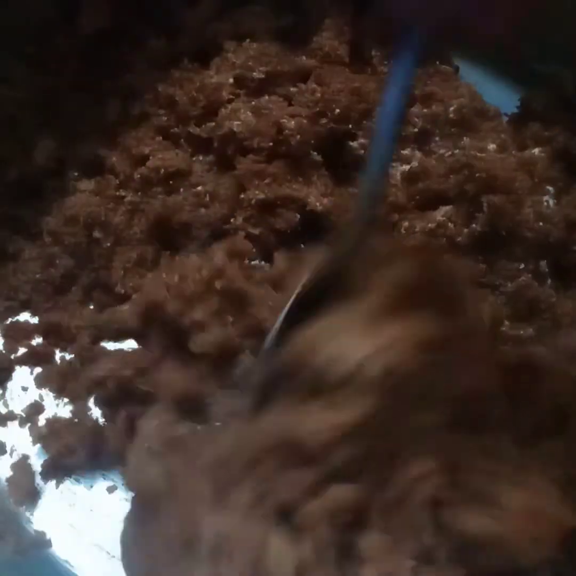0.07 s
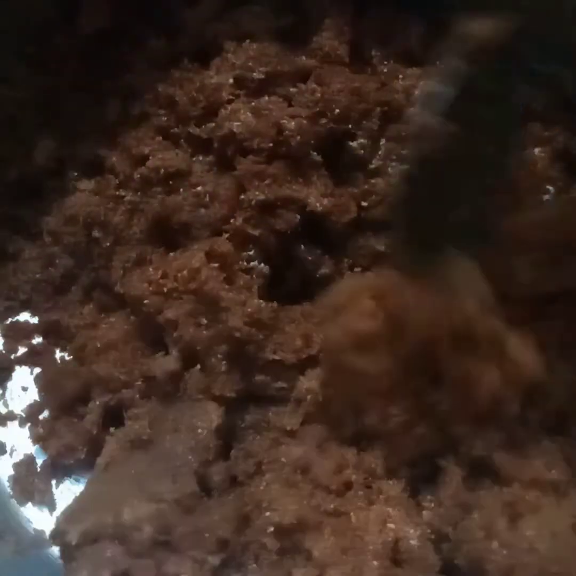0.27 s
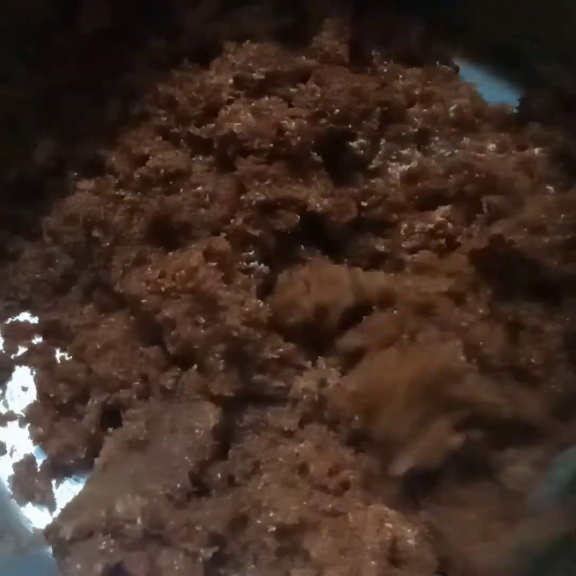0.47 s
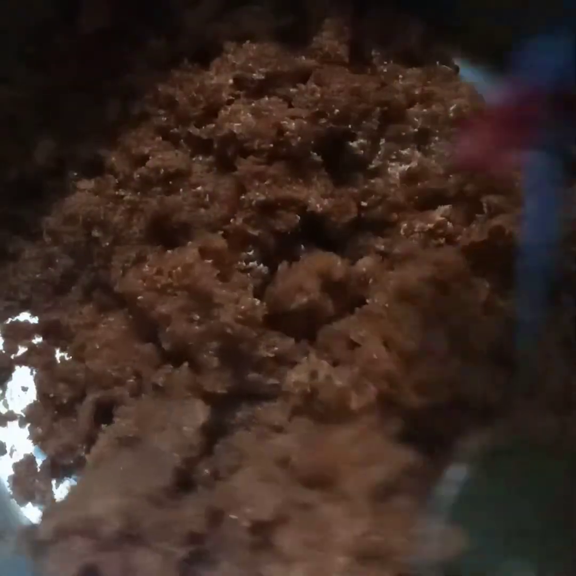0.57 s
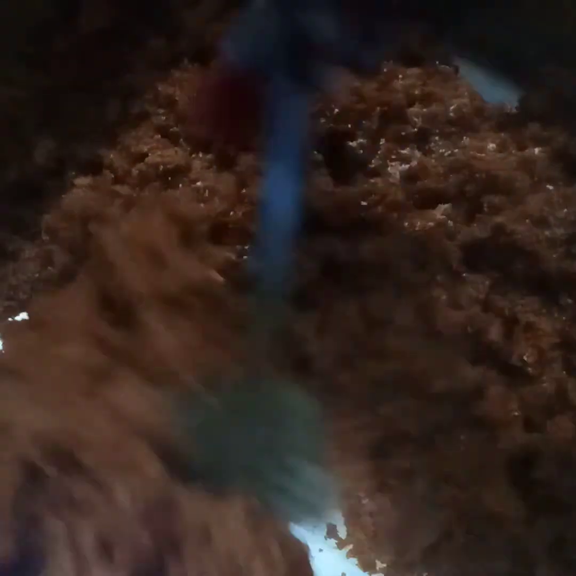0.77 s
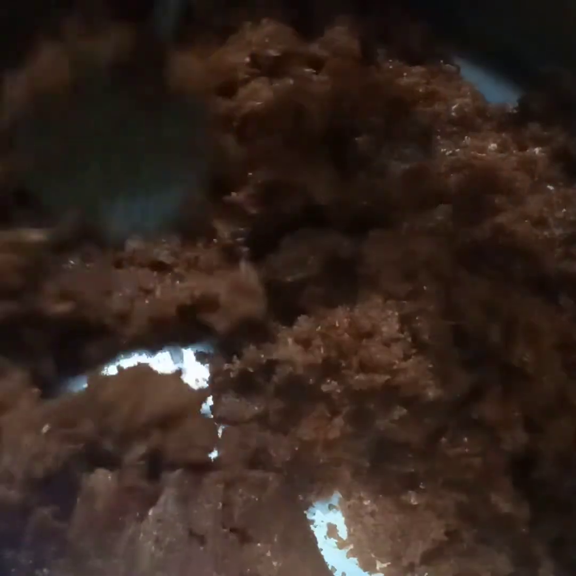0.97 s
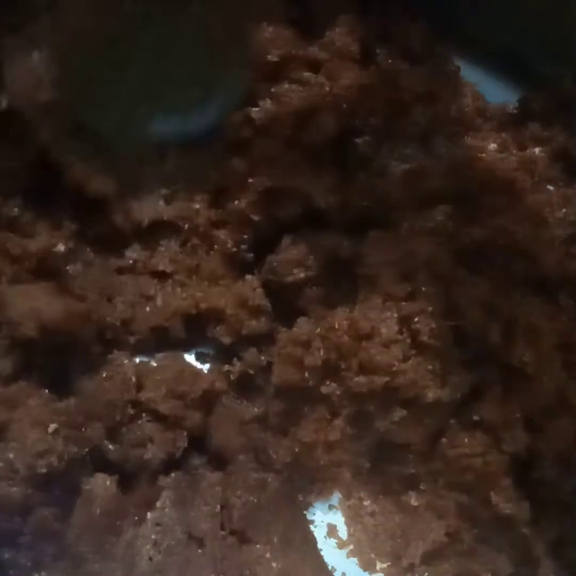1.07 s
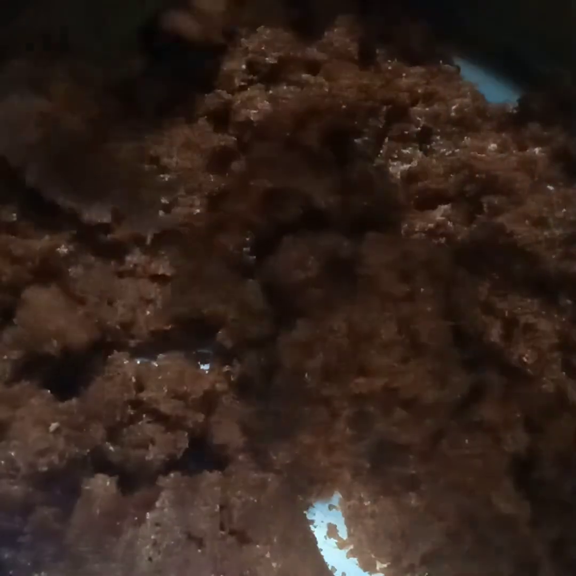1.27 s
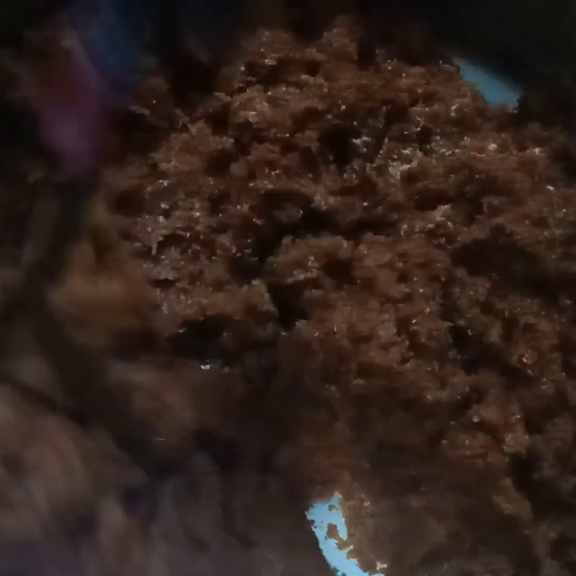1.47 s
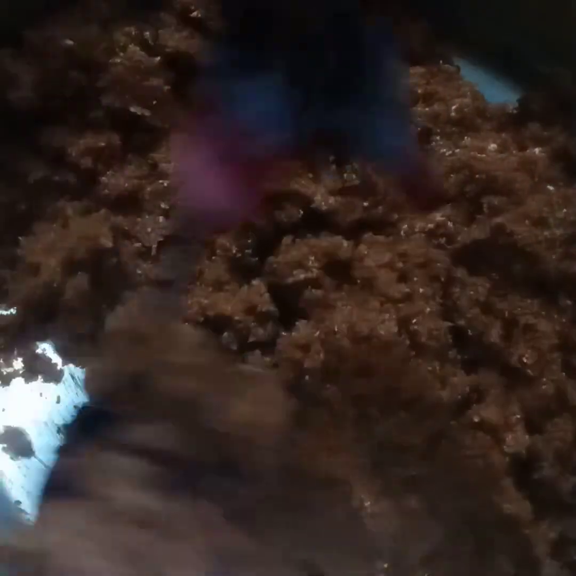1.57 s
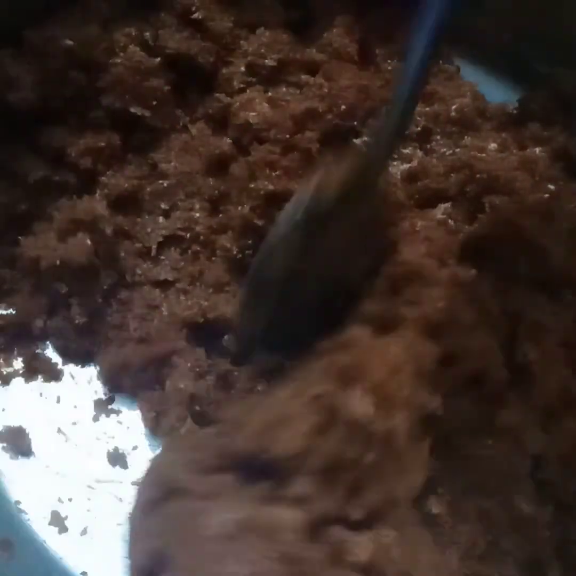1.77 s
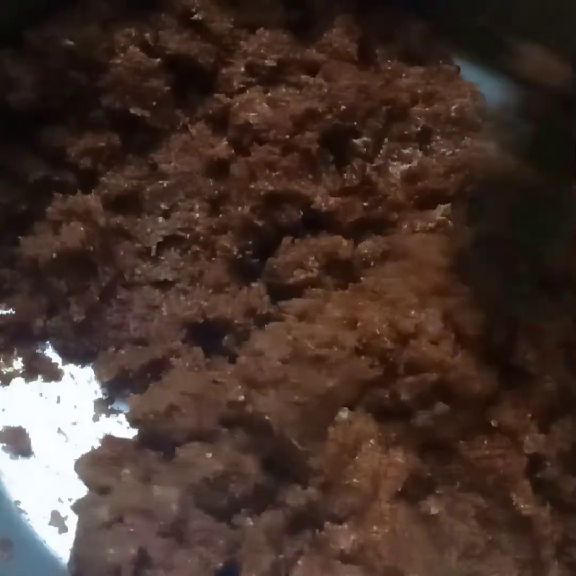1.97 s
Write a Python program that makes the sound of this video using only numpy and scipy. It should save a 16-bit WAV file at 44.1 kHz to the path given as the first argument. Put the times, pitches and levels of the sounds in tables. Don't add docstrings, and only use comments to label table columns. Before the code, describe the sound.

A metal spatula stirs thick pudding in a hot pot: wet sizzle first, a ringing clank, more sizzling, then two quick knocks with gritty scraping; heard very close on a phone microphone with little room echo.

```python
import sys
import numpy as np
from scipy import signal
from scipy.fft import rfft, irfft
from scipy.io import wavfile
from scipy.ndimage import uniform_filter1d

SR = 44100
rng = np.random.default_rng(int(sys.argv[2]) if len(sys.argv) > 2 else 0)


def int16_out(signal):
    q = np.round(np.clip(np.atleast_2d(signal).T, -1, 1) * 32767)
    wavfile.write(sys.argv[1], SR, q.astype(np.int16))


def gain_from_db(level_db):
    decades = np.asarray(level_db, float) / 20
    return 10 ** decades


N = 88817

# (t/s, ring level/dB, crash level/dB, crash t60/s, contact/s)
KNOCK_EVENTS = [
    (0.5176, -27, -17.5, 0.25, 0.0052),
    (1.3039, -25.5, -18.5, 0.075, 0.00065),
    (1.5185, -20.5, -22, 0.53, 0.00264),
]
# (start/s, rise/s, t60/s, grit level/dB, pot ring level/dB)
SCRAPE_EVENTS = [
    (1.336, 0.037, 0.15, -28, -32),
    (1.501, 0.0018, 0.18, -19, -56),
    (1.534, 0.0018, 0.014, -16, -32.5),
    (1.547, 0.064, 0.33, -26, -29.5),
]
BASE_MODE_HZ = [238, 576, 797, 899, 1408, 1676, 1874, 2525, 3434, 3610, 3919, 965, 6900, 1740]
# (level/dB, t60/s, build-up/s)
BASE_MODES = [(-4, 0.23, .015), (-10.5, 0.6, 0.0083), (-17.5, 2, 0.078), (-16, 1.6, 0.022),
              (-22, 1.08, 0.16), (-7.5, .5, 0.011), (-19.5, 0.64, 0.11), (-9.5, 0.22, 0.0029),
              (4, 0.12, 0.00081), (-3, 0.14, 0.0042), (-6.5, 0.21, .004), (-17, 1.35, 0.014),
              (3, 0.042, 0.0014), (-11.5, 0.53, .015)]
WALL_MODE_HZ = [227, 262, 354, 452, 555, 576, 798, 822, 899, 969, 1113, 1258, 1600, 1017]
# (level/dB, t60/s, build-up/s)
WALL_MODES = [(-3, 0.27, 0.011), (-9, 0.25, 0.018), (-11, 0.27, 0.007), (-11, .3, 0.0072),
              (-3, 0.069, 0.0039), (0.5, 0.069, 0.0087), (-10, 2.17, 0.064), (-12, 0.49, 0.0043),
              (-25, 1.82, 0.055), (-26, 0.98, 0.056), (-2.5, 0.057, 0.0027), (-25, .13, 0.0032),
              (-4, 0.086, 0.0028), (-15, 0.5, 0.0046)]


def evened(x):
    return x / np.sqrt(np.mean(x ** 2) + 1e-20)


def colour(x, points):
    f_hz, level_db = np.transpose(points)
    bin_hz = np.fft.rfftfreq(len(x), 1 / SR)
    gain = gain_from_db(np.interp(np.log(bin_hz + 1), np.log(f_hz), level_db))
    return evened(irfft(rfft(x) * gain, len(x)))


def add(mix, start_s, sound):
    part = mix[round(start_s * SR):][:len(sound)]
    part += sound[:len(part)]


def ring(x, hz, t60_s):
    radius = np.exp(-np.log(1000) / (max(t60_s, .002) * SR))
    w = 2 * np.pi * hz / SR
    return signal.lfilter([np.sin(w)], [1, -2 * radius * np.cos(w), radius * radius], x)


def body(push, pitches_hz, modes):
    total = 0
    for hz, (level_db, t60_s, rise_s) in zip(pitches_hz, modes):
        tone = ring(ring(push, hz, t60_s), hz, 3 * rise_s)
        total = total + gain_from_db(level_db) * tone / abs(tone).max()
    return total


def crackle(per_s, spread_db, hiss):
    struck = rng.random(N) < per_s / SR
    size = gain_from_db(spread_db * np.minimum(rng.exponential(1, N), 4)) * struck
    bursts = signal.lfilter([1], [1, -.93], size) * rng.standard_normal(N)
    flicker = evened(uniform_filter1d(rng.standard_normal(N), size=500))
    return (evened(bursts) + hiss * rng.standard_normal(N)) * gain_from_db(1.1 * flicker)


def patchy(x, patch_db, lump_db):
    z = signal.stft(x, nperseg=512)[2]
    drift = uniform_filter1d(rng.standard_normal(z.shape), size=6, axis=0)
    drift = evened(uniform_filter1d(drift, size=10, axis=1))
    lumps = evened(uniform_filter1d(rng.standard_normal((len(z), 1)), size=2, axis=0))
    z = z * gain_from_db(patch_db * drift + lump_db * lumps)
    return evened(signal.istft(z, nperseg=512)[1][:len(x)])


def stove():
    centre_hz, width_hz, level_db = 4310, 340, -62.5
    edges_hz = [centre_hz - width_hz / 2, centre_hz + width_hz / 2]
    band = signal.butter(5, edges_hz, "band", fs=SR, output="sos")
    hiss = evened(signal.sosfilt(band, rng.standard_normal(N)))
    waver = evened(uniform_filter1d(rng.standard_normal(N), size=2500))
    return hiss * gain_from_db(level_db + 2 * waver)


def sizzle():
    # (t/s, sizzle level/dB, wet slide level re sizzle/dB)
    bared_metal = [(0, -33, -0.5), (.06, -30, -2), (.2, -36, -1.5), (0.241, -42, -4.5), (0.342, -42.5, -11),
                   (.44, -49, -15), (.52, -53.5, -5), (.68, -44, 3), (.76, -37, -4.5), (.95, -35.5, -0.5),
                   (1.074, -34.5, -2), (1.17, -49.5, -9.5), (1.3, -53, -18), (1.48, -35.5, 0),
                   (1.7, -46.5, 2.5), (1.78, -38.5, -3.5), (1.88, -51.5, -7), (2.02, -48.5, -5.5)]
    # (f/Hz, level/dB)
    fizz_spectrum = [(3000, -86), (5300, -9), (5900, -5.5), (7400, 3), (9000, -5), (11500, -7),
                     (14500, 1.5), (16500, -3.5)]
    # (f/Hz, level/dB)
    slide_spectrum = [(60, -65), (200, -15.5), (600, -17.5), (1200, -6), (2500, -6.5), (3600, 0.5),
                      (5000, -5), (8000, -52)]
    at_s, level_db, slide_db = np.transpose(bared_metal)
    t = np.arange(N) / SR
    fizz = colour(patchy(crackle(2500, 4.6, 1.3), 2.2, 1.5), fizz_spectrum)
    slide = colour(patchy(crackle(1100, 3.2, 1.6), 2.4, .6), slide_spectrum)
    slide_gain = gain_from_db(np.interp(t, at_s, slide_db) - 10.5)
    return gain_from_db(np.interp(t, at_s, level_db)) * (fizz + slide_gain * slide)


def spits():
    # (t/s, peak level/dB, f/Hz)
    spits_ticks = [(.2384, -29, 13500), (.257, -35, 6500), (.2723, -31, 6000), (.2947, -35, 7200),
                   (.313, -34, 14000), (.326, -33, 6500), (.336, -31, 14200), (.3521, -20, 8800),
                   (.3542, -24, 8500), (.375, -33, 6900), (.48, -39, 14000), (.9373, -24, 7600),
                   (1.035, -29, 7400), (1.055, -28, 7000), (1.1089, -26, 7100), (1.112, -29, 7100),
                   (1.1348, -32, 7100), (1.15, -35, 6700), (1.1782, -39, 14500), (1.2216, -35, 7600),
                   (1.2655, -32, 7500), (1.49, -29, 8000), (1.5035, -22, 11000), (1.506, -23, 12500),
                   (1.519, -23, 11500), (1.536, -21, 11500), (1.365, -27, 12500), (.5185, -20, 12000),
                   (1.305, -23, 12500), (1.813, -42, 2000), (1.662, -25, 8000), (1.7459, -28, 11000),
                   (1.788, -29, 10000), (1.798, -27, 10000), (1.801, -28, 7600), (1.826, -32, 8500)]
    out, t = np.zeros(N), np.arange(700) / SR
    for start_s, peak_db, hz in spits_ticks:
        puff = np.diff(rng.standard_normal(700) * gain_from_db(-60 * t / .009))
        band = signal.butter(3, [.8 * hz, min(1.2 * hz, 17000)], "band", fs=SR, output="sos")
        puff = evened(signal.sosfilt(band, puff)) + .15 * evened(puff)
        add(out, start_s, gain_from_db(peak_db - 1.5) * puff / abs(puff).max())
    return out


def plops():
    # (t/s, peak level/dB, f/Hz, t60/s)
    damped_tones = [(0.00187, -42.5, 370, 0.33), (0.00374, -44.5, 650, 0.24), (.07, -49, 670, 0.34),
                    (0.63, -58, 67, .5), (.59, -40.5, 287, 0.38), (1.72, -49.5, 310, .4),
                    (0.21, -42.5, 183, 0.15), (0.22, -41, 510, 0.1), (.224, -50, 1150, 0.09),
                    (0.19, -47, 1160, 0.14), (0.33, -55, 1360, .12), (0.223, -46, 2060, 0.15),
                    (0.34, -61, 1324, 0.27), (0.4, -52, 1300, 0.16), (0.942, -69, 570, 0.055),
                    (1.12, -50, 65, 0.62), (1.075, -50.5, 430, 0.11), (1.813, -45.5, 1700, 0.38),
                    (1.8, -46.5, 360, 0.12), (1.5, -28, 98, .2), (0.1, -50, 260, 0.32),
                    (1.35, -38, 170, 0.81)]
    out, t = np.zeros(N), np.arange(SR // 2) / SR
    onset = np.minimum(t / 0.00043, 1)
    for start_s, peak_db, hz, t60_s in damped_tones:
        push = rng.standard_normal(len(t)) * gain_from_db(-60 * t / t60_s) * onset
        tone = ring(ring(push, hz, .01), hz, .012 + 3 / hz)
        add(out, start_s, gain_from_db(peak_db) * tone / abs(tone).max())
    return out


def touches():
    # (t/s, f/Hz)
    touch_times = [(.5185, 1748), (.5185, 2370), (.5185, 1410), (.5185, 2640), (.575, 1782), (.553, 590),
                   (.6, 2540), (1.357, 1678), (1.345, 3740), (1.4, 2525), (1.39, 4134), (1.5183, 900),
                   (1.56, 238), (1.615, 238), (1.545, 576), (1.625, 576), (1.72, 576), (1.59, 452),
                   (1.812, 1710), (.222, 1080), (.25, 1200), (.405, 1290), (1.04, 105), (1.38, 238),
                   (.935, 530), (.68, 1400)]
    # (level/dB, t60/s, build-up/s)
    touch_tones = [(-42, 0.61, .002), (-40, 0.4, .002), (-49.5, 0.44, 0.0015), (-49, 0.19, 0.0018),
                   (-35, .1, 0.0046), (-31, .1, .004), (-45.5, .2, 0.0071), (-31.5, 0.39, 0.0024),
                   (-29, 0.078, 0.0035), (-33.5, 0.08, .012), (-41, 0.19, .008), (-9.5, 0.005, 0.00026),
                   (-22.5, 0.12, 0.012), (-30.5, .55, 0.029), (-23, 0.144, 0.012), (-28, 0.24, 0.073),
                   (-44.5, 2.3, 0.039), (-33, 0.22, 0.013), (-52, 0.17, 0.0009), (-53.5, 0.096, .004),
                   (-54, 0.085, 0.0068), (-57, .1, 0.0017), (-50.5, 0.58, 0.016), (-40, 0.49, 0.014),
                   (-60, 0.062, 0.004), (-59, 0.42, .02)]
    flutter_db = 2.5
    out, t = np.zeros(N), np.arange(SR // 2) / SR
    for (start_s, hz), (level_db, t60_s, rise_s) in zip(touch_times, touch_tones):
        swell = gain_from_db(-60 * t / t60_s) * (1 - np.exp(-t / rise_s)) ** 2
        drift = uniform_filter1d(rng.standard_normal(len(t)), size=300)
        drift = evened(uniform_filter1d(drift, size=300))
        waver = gain_from_db(flutter_db * min(hz / 1500, 1) * drift)
        tone = np.sin(2 * np.pi * hz * (t + round(start_s * SR) / SR))
        add(out, start_s, gain_from_db(level_db) * swell / swell.max() * waver * tone)
    return out


def scrapes():
    # (f/Hz, level/dB)
    grit_spectrum = [(100, -34), (800, -31), (2000, -5.5), (4500, -2), (6200, -0.5), (7500, 6.5),
                     (11000, -7), (16500, -4.5)]
    grit = colour(patchy(crackle(1800, 2.5, 1.6), 1.8, 2.2), grit_spectrum)
    drive, out = rng.standard_normal(N), np.zeros(N)
    t = np.arange(N) / SR
    pitch_sets = [BASE_MODE_HZ] + 3 * [WALL_MODE_HZ]
    mode_sets = [BASE_MODES] + 3 * [WALL_MODES]
    for event, pitches_hz, modes in zip(SCRAPE_EVENTS, pitch_sets, mode_sets):
        start_s, rise_s, t60_s, grit_db, pot_db = event
        stroke = np.clip((t - start_s) / rise_s, 0, 1)
        stroke = stroke * gain_from_db(-60 * np.maximum(t - start_s - rise_s, 0) / t60_s)
        damped = [(db, min(mode_t60_s, .25), build_s) for db, mode_t60_s, build_s in modes]
        out += gain_from_db(grit_db) * stroke * grit
        out += gain_from_db(pot_db) * body(stroke * drive, pitches_hz, damped)
    return out


def knocks():
    rim_mode_hz = [236, 573, 798, 897, 1782, 2079, 2510, 3430, 3912, 4134, 5120, 1050, 7340, 9940]
    # (level/dB, t60/s, build-up/s)
    rim_modes = [(-19, 0.65, 0.042), (-8.5, 0.35, 0.0023), (-23.5, 1, 0.1), (-19, 1.95, 0.048),
                 (-4, 0.38, .002), (-19, 0.64, 0.067), (-1, 0.057, 0.0015), (1, 0.13, 0.0021),
                 (0.5, 0.2, 0.0032), (-15, .2, .003), (-1.5, .1, .003), (-15.5, 0.036, 0.0026),
                 (7, 0.11, 0.0018), (4, 0.092, 0.0033)]
    # (f/Hz, level/dB)
    crash_spectra = [
        [(200, -14), (800, -15.5), (2900, -10), (3700, -1), (5700, -6.5), (7400, 1.5), (11000, -10),
         (16500, -4)],
        [(100, 1), (500, -6.5), (1500, -5), (3500, 0), (5500, -2.5), (7000, -2), (11000, -21), (16500, -8)],
        [(100, 8), (500, 10), (1200, 8), (2500, -6.5), (5000, -6.5), (7400, 3), (11000, -29), (16500, -32)],
    ]
    tail_db, tail_t60_s = -6.5, 0.51
    bass_hz, bass_rise_s = 457, 0.043
    smother_s, smother_db_per_s = 1.04, 110
    out, t = np.zeros(N), np.arange(SR * 3 // 2) / SR
    u = t[:SR // 2, None]
    small_hz = 300 + 15500 * rng.random(260) ** 1.5
    small_t60_s = tail_t60_s * np.exp(0.16 * rng.standard_normal(260))
    bass_filter = signal.butter(2, bass_hz, fs=SR, output="sos")
    pitch_sets = rim_mode_hz, BASE_MODE_HZ, WALL_MODE_HZ
    mode_sets = rim_modes, BASE_MODES, WALL_MODES
    for event, pitches_hz, modes, spectrum in zip(KNOCK_EVENTS, pitch_sets, mode_sets, crash_spectra):
        start_s, ring_db, crash_db, t60_s, contact_s = event
        chatter = rng.standard_normal(len(t)) * np.exp(-t / contact_s)
        push = (t == 0) + 0.22 * chatter / np.sqrt(contact_s * SR / 20)

        crash = colour(rng.standard_normal(len(t)), spectrum)
        crash = crash * gain_from_db(-60 * t / t60_s) * np.minimum(t / 0.00069, 1)

        f_hz, level_db = np.transpose(spectrum)
        height_db = np.interp(np.log(small_hz), np.log(f_hz), level_db)
        height = gain_from_db(height_db + 1.74 * rng.standard_normal(260))
        small = np.sin(2 * np.pi * (small_hz * u + rng.random(260))) * gain_from_db(-60 * u / small_t60_s)
        thicket = small @ height / np.linalg.norm(height) * np.minimum(u[:, 0] / 0.00067, 1)
        add(crash, 0, gain_from_db(tail_db) * thicket)

        bass = signal.sosfiltfilt(bass_filter, np.pad(crash, (2000, 0)))[2000:]
        crash = crash - bass * np.exp(-t / bass_rise_s)
        covered_s = np.maximum(start_s + t - smother_s, 0) * (start_s < smother_s)
        pot = body(push, pitches_hz, modes) * gain_from_db(-smother_db_per_s * covered_s)
        add(out, start_s, gain_from_db(ring_db) * pot + gain_from_db(crash_db) * crash)
    return out


def scene():
    return (stove() + sizzle() + spits() + plops() + touches() + scrapes() + knocks())[None]


def band_limit(x):
    return signal.sosfilt(signal.butter(12, 16800, fs=SR, output="sos"), x)


def record(dry):
    # (f/Hz, level/dB)
    noise_spectrum = [(25, 1), (110, -4), (220, 6), (400, -8), (900, -6), (1400, -2.5), (2500, -15),
                      (5000, -34)]
    noise_db, edge_hz, top_db = -72.5, 15560, -34
    cut = signal.sosfilt(signal.butter(4, 150, "high", fs=SR, output="sos"), dry)
    cut = cut + gain_from_db(noise_db) * colour(rng.standard_normal(N), noise_spectrum)
    lowpass = signal.firwin(801, edge_hz, window=("kaiser", 10), fs=SR)
    low = signal.oaconvolve(cut, lowpass[None], "same")
    t = np.arange(N) / SR
    attacks_s = [row[0] for row in KNOCK_EVENTS] + [SCRAPE_EVENTS[1][0]]
    attack = sum(abs(t - s - .002) < .004 for s in attacks_s)
    top_gain = gain_from_db(top_db) * uniform_filter1d(1. * attack, size=150)
    return band_limit(low + top_gain * (cut - low))


dry = scene()
out = record(dry)
int16_out(out)
```